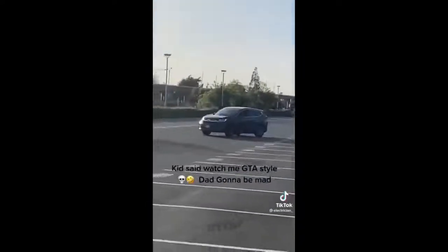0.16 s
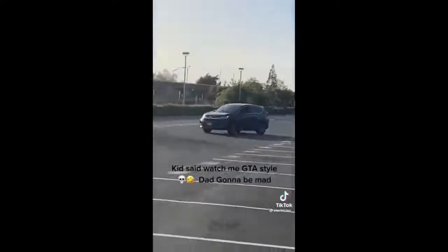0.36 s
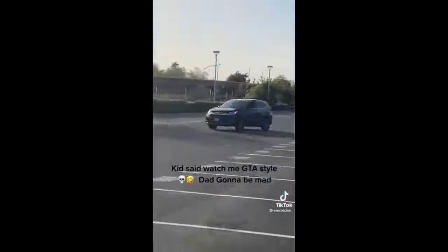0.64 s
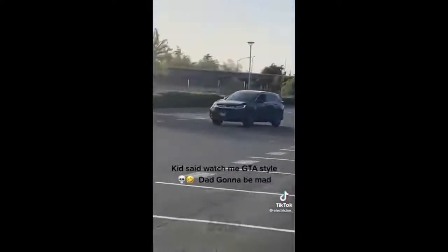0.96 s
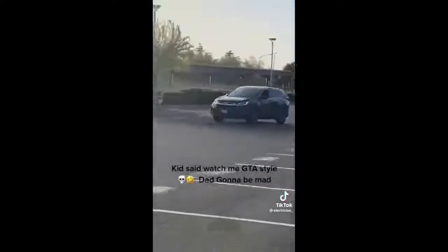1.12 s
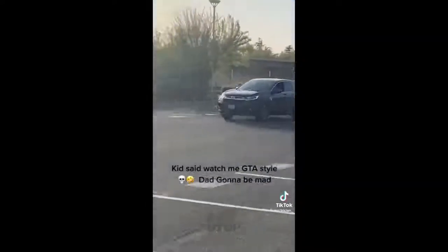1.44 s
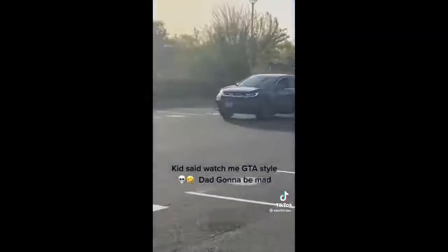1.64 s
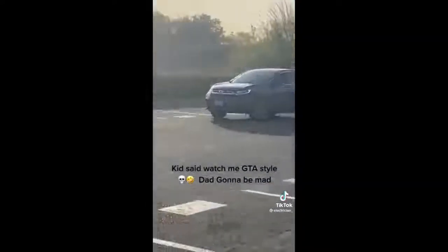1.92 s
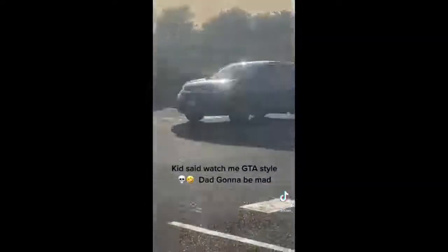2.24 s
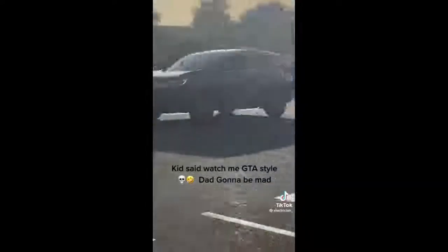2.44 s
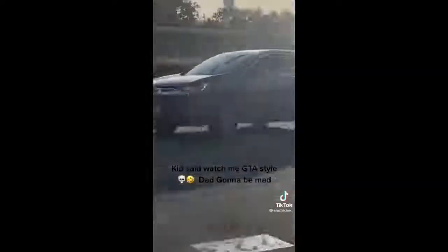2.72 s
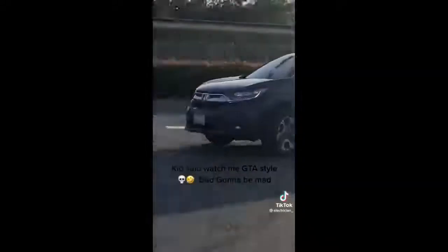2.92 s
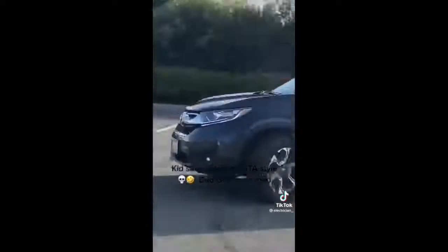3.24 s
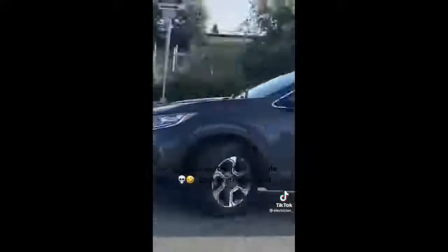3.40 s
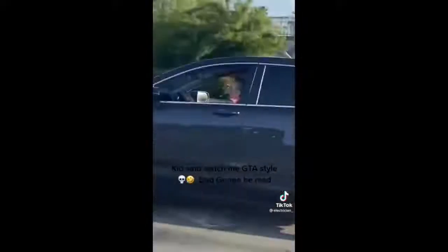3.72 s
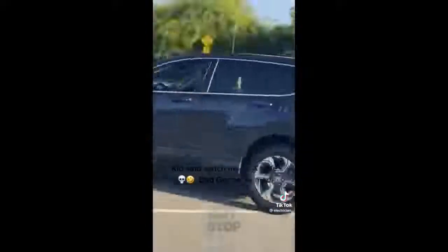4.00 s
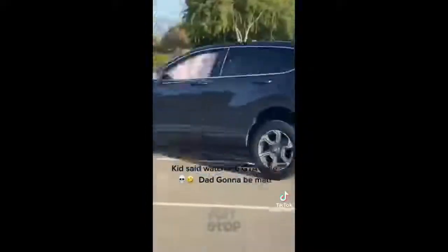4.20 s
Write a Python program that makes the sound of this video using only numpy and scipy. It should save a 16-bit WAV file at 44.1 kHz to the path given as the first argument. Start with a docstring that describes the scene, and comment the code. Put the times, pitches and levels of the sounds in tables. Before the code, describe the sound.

Low distant hum and rolling tyres build into loud, wavering tyre squeals sliding slightly down in pitch, cut off by a burst of air.

```python
"""An empty asphalt lot: a car speeds up and skids through a tight turn close to a phone's microphone.
Its tread sticks and slips about a thousand times a second: ragged squeals narrow towards one falling tone.
Sine partials form squeal and exhaust hum; coloured noise forms scrape, road roar and wind.
A distant hum comes before the turn; at the end a blast of air hits the microphone."""
import sys
import numpy as np
from scipy import signal
from scipy.fft import rfft, irfft, next_fast_len
from scipy.io import wavfile
from scipy.ndimage import uniform_filter1d, map_coordinates

SR = 44100
rng = np.random.default_rng(int(sys.argv[2]) if len(sys.argv) > 2 else 0)


def pcm_store(signal):
    """Save signal as 16-bit PCM."""
    levels = np.round(np.clip(np.atleast_2d(signal), -1, 1) * 32767)
    wavfile.write(sys.argv[1], SR, levels.astype(np.int16).T)


N = 192276

# Every "half" below is the standard deviation of a bell-shaped swell.
# Stick-slip rate of the loaded tyre, sliding wide and then biting again: [t/s, f/Hz]
SLIP_PITCH = [
    [(2.12, 1223), (2.18, 1203), (2.255, 1172), (2.29, 1126), (2.335, 1184), (2.38, 1083), (2.42, 1145),
     (2.46, 1166), (2.51, 1129), (2.59, 1148), (2.66, 1092), (2.69, 1125), (2.72, 1088), (2.77, 1089),
     (2.83, 1040), (2.89, 1102), (2.96, 1065), (3.005, 963), (3.05, 1077)],
    [(3.08, 1197), (3.12, 1127), (3.172, 1121), (3.195, 1043), (3.31, 1044), (3.385, 1013), (3.428, 972),
     (3.445, 995), (3.47, 952), (3.49, 989), (3.515, 950.4), (3.54, 979.7), (3.565, 955), (3.612, 992),
     (3.635, 1032), (3.68, 952.5), (3.71, 904.7), (3.738, 940), (3.768, 940), (3.81, 996.4), (3.86, 974),
     (3.885, 1011), (3.93, 965), (3.965, 975), (4.01, 1006), (4.035, 946), (4.05, 990), (4.095, 991),
     (4.115, 925)],
]
# Squeal strength before the balance with the other patches: [t/s, fundamental/dB, octave/dB]
SQUEAL_LEVELS = [(2.1, -34, -47), (2.15, -29.5, -40), (2.2, -31, -27), (2.35, -20, -19), (2.5, -22, -22.5),
                 (2.72, -20, -19), (2.83, -23, -27.5), (2.92, -20.5, -22.5), (3.04, -21.5, -24.5),
                 (3.15, -20.5, -16), (3.22, -17.5, -19), (3.26, -21, -21), (3.48, -26, -21),
                 (3.535, -20, -19.5), (3.6, -23.5, -22), (3.73, -28.5, -22.5), (3.795, -22, -24.5),
                 (3.86, -22, -23), (3.92, -28.5, -26.5), (3.99, -28.5, -22.5), (4.1, -33, -31),
                 (4.125, -27.5, -28.5)]
# Other tread patches against the leading tone: [pitch ratio, fundamental/dB, octave/dB]
TREAD_PATCHES = [(.86, -15.5, -14.5), (.93, -3, -6.5), (.975, 1.5, 1.5), (1.04, -1.5, -3.5),
                 (1.1, 0.5, -29), (1.19, -3.5, -22), (1.4, -7, -15.5)]
# Upper partials against the octave: [multiple, sliding/dB, singing/dB, once past/dB]
UPPER_PARTIALS = [(3, -22, -19.5, -11), (4, -26, -22, -22), (5, -34, -28, -32), (6, -42, -38, -42)]
# Brief level changes where the tread catches: [t/s, fundamental change/dB, octave change/dB]
TREAD_CATCHES = [(2.399, -7, -4), (2.97, -6, 5.5), (3.196, -12.5, 2), (3.263, -11.5, -4), (3.303, -4, 0.5),
                 (3.462, -1, -5), (3.604, -9, -0.5), (3.622, 0.5, -8.5), (3.73, -1.5, -5.5),
                 (3.926, 2.5, -1), (4.03, 2, -3), (4.1, -1.5, 0.5)]
CATCH_HALF_S = 0.006
# Short slips where the tread snaps loose: [t/s, f/Hz, fundamental/dB, octave/dB, half/s]
SNAP_CHIRPS = [(2.387, 966, -30, -28, 0.016), (2.407, 1156, -15.5, -34, 0.0064),
               (2.565, 1085, -29, -21.5, .006), (2.66, 1084, -27, -13, 0.006),
               (2.825, 982, -33, -32, 0.013), (3.001, 944.5, -16, -16.5, 0.0056),
               (3.124, 1015, -22, -21, 0.026), (3.632, 1134, -28, -26.5, 0.009),
               (3.793, 1103, -25, -24, 0.0068), (3.88, 1134, -29.5, -31, 0.0085),
               (4.03, 840, -38, -32, .012), (4.068, 810, -35.5, -36, 0.016),
               (4.13, 901.5, -32, -34, 0.0065)]
CHIRP_SAG_HZ_PER_S = 1500
# Many patches sing while the tyre slides wide, then it settles
SLIDE_S, SPREAD_S, SETTLE_S, SETTLING_S = 2.1, 0.086, 3.053, 0.11
# The other patches against the leading tone
SLIDING_DB, SETTLED_DB = 2, -7
# The upper partials change as the tyre starts to sing, and again as it passes the listener
SING_S, SINGING_S = 3.05, 0.22
PASS_S, PASSING_S = 3.493, 0.29
# Short strands of each patch: nominal strands a second; sag and scatter as shares of pitch; strength spread
STRAND_RATE, STRAND_SAG, STRAND_SCATTER, STRAND_DB = 13, 0.045, 0.014, 2

# Colour of rubber scraping over asphalt: [f/Hz, relative level/dB]
SCRAPE_COLOUR = [(300, -45), (700, -12), (1000, 4.5), (1500, -1), (2000, 8), (2700, -5), (3400, -5),
                 (3900, -11.5), (5000, -12.5), (6000, -23), (8000, -60), (11000, -34.5), (15500, -42.5)]
# Harsh bites of rubber on stone: [t/s, level/dB, half/s]
RUBBER_BITES = [(2.03, -37.5, 0.0021), (2.59, -36, 0.022), (2.652, -28.5, 0.013), (2.725, -30, 0.0065),
                (3.07, -42, .012), (3.605, -31, 0.016), (3.655, -35, 0.021), (3.795, -31.5, 0.015),
                (3.875, -38, .018), (3.99, -39.5, 0.015)]
# Colour of those bites: [f/Hz, relative level/dB]
BITE_COLOUR = [(1500, -15.5), (2500, -1), (3400, 4.5), (4500, -4), (6000, -23), (12000, -33)]
# The scrape swells, holds through the turn and eases as the tyre grips
SCRUB_S, SCRUB_ATTACK_S, SCRUB_END_S, SCRUB_RELEASE_S = 1.883, 0.46, 3.837, 0.68
SCRUB_DB, SCRUB_DEPTH_DB = -26.5, 20
# A tyre that sings purely rasps less
SMOOTHER_DB, SMOOTHING_S = 4.5, 0.74

# Rolling-tyre roar before a fixed gain: [t/s, level/dB]
ROAD_LEVEL = [(0.0, -52.5), (1.24, -47), (1.42, -45), (2.24, -36.5), (2.97, -44.5), (3.14, -49),
              (3.33, -56.5), (3.77, -53.5), (4.05, -54)]
# Colour of the roar: [f/Hz, relative level/dB]
ROAR_COLOUR = [(120, -28), (240, -0.5), (420, -1.5), (600, 3.5), (900, 3), (1150, -1.5), (1550, 0),
               (2100, -11.5), (3000, -31), (5000, -66)]
# Colour of the tread hiss: [f/Hz, relative level/dB]
HISS_COLOUR = [(1200, -28), (2200, 4), (4000, -1), (6000, -13), (9000, -12), (15500, -29.5)]
HISS_DB = -16  # against the roar
# Extra swells of hiss, the strongest at the close pass: [t/s, level/dB, half/s]
HISS_RISES = [(.02, -64, 0.054), (.55, -63, 0.081), (1.1, -66.5, 0.32), (2.9, -43.5, 0.56)]
# Soft thumps of wheels on uneven asphalt: [t/s, level/dB, half/s]
WHEEL_THUMPS = [(.21, -48, 0.011), (.295, -51, .016), (.875, -41, 0.012), (1.335, -45.5, 0.014),
                (1.378, -41, 0.025), (1.434, -37.5, 0.0097), (1.71, -40, 0.018), (1.81, -48, .016),
                (2.06, -34.5, 0.018)]
# Colour of the thumps: [f/Hz, relative level/dB]
THUMP_COLOUR = [(200, -6), (450, -4), (580, 8), (800, -5), (1500, -35), (4000, -43)]
# Slow surges and fine grain of the surface: random knots a second and depth
SURGE_RATE, SURGE_DB, GRAIN_RATE, GRAIN_DB = 22, 1.3, 190, 1.7

# Engine revs up, coasts down and is hidden as the nose sweeps past; two firings a turn:
# [t/s, firing f/Hz, firing tone/dB, harmonics/dB]
ENGINE_RUN = [(0, 112, -60, -47), (1.2, 114, -48, -47), (1.62, 123.4, -41, -34.5),
              (1.89, 131.8, -32.5, -33), (2.05, 140.2, -30, -24.5), (2.18, 146.3, -28.5, -29),
              (2.32, 155.1, -25, -25.5), (2.45, 162.9, -27, -36), (2.7, 168.1, -30, -33),
              (2.85, 170, -29, -39), (3.1, 165.5, -33.5, -33.5), (3.22, 134.8, -49, -46),
              (3.27, 125, -62, -53), (3.47, 118.3, -66, -53), (3.58, 115.4, -48, -52), (4.1, 113, -48, -58)]
# Exhaust harmonics: [multiple of the crankshaft rate, relative level/dB]
EXHAUST_HARMONICS = [(4, -17), (5, -25.5), (6, -13.5), (7, -21), (8, -18), (9, -22), (10, -22)]
# Exhaust-pipe resonances: [f/Hz, gain/dB]
PIPE_RESONANCES = [(250, 2), (330, -18.5), (385, 5.5), (450, -13), (505, -2), (550, -10), (610, 4),
                   (700, -12), (900, 5)]

# Wind rumble before a fixed gain: [t/s, level/dB]
WIND_LEVEL = [(0.0, -44.5), (1.48, -42.5), (2.1, -40), (2.29, -34), (2.55, -37), (2.72, -41), (2.82, -36),
              (3.12, -35.5), (3.18, -51), (3.28, -64.5), (4.0, -60)]
# Colour of the rumble: [f/Hz, relative level/dB]
RUMBLE_COLOUR = [(15, -46), (28, -21), (42, 0), (62, 2.5), (120, 0.5), (200, -5.5), (320, -29.5),
                 (450, -25), (800, -75)]
# The passing car stirs the rumble, so that it differs between the two ports
STIR_S, STIR_HALF_S, STIR_DB = 2.5, 0.68, -6.5
# Sharp puffs of air at the microphone: [t/s, low thud/dB, flutter/dB, half/s]
AIR_PUFFS = [(2.396, -27.5, -27.5, 0.011), (2.42, -20, -55, 0.0097), (2.582, -26.5, -33.5, 0.0095),
             (2.759, -31.5, -33, .007), (2.801, -23.5, -37, 0.015), (2.849, -23.5, -27, 0.012),
             (2.887, -26, -25.5, 0.014), (2.961, -20.5, -26, 0.02), (3.008, -21.5, -32.5, 0.014),
             (3.056, -26, -34.5, .014), (3.093, -23, -22.5, 0.012), (3.118, -22, -37.5, .014),
             (4.139, -22, -28.5, 0.011), (4.184, -17.5, -23, 0.015), (4.226, -22.5, -32, 0.011),
             (4.26, -31, -50, 0.013)]
# Colour of the thud: [f/Hz, relative level/dB]
THUD_COLOUR = [(25, -32), (55, -12), (85, 3), (170, 3), (240, -9), (400, -26.5), (900, -63)]
# Colour of the flutter: [f/Hz, relative level/dB]
FLUTTER_COLOUR = [(130, -20), (220, -1), (310, 2), (420, -6.5), (600, -15), (900, -15), (1500, -12),
                  (4000, -54)]
# Surges of the last, harsh blast: [t/s, level/dB, time from onset to fall/s]
BLAST_SURGES = [(4.127, -28, 0.061), (4.148, -17.5, 0.0078), (4.163, -13, 0.026), (4.253, -33, 0.012)]
BLAST_ATTACK_S, BLAST_FALL_DB_PER_S = 0.004, 519
# Colour of the blast: [f/Hz, relative level/dB]
BLAST_COLOUR = [(60, -17), (100, -3), (190, -7.5), (280, 5.5), (400, -8.5), (520, -1.5), (660, 6.5),
                (900, -1.5), (1400, -7), (2200, -8.5), (3800, -10), (6200, -21), (9000, -25), (15500, -33)]
# A rush and a rumble start with the blast and last to the end
AFTER_RUSH_DB, AFTER_RUMBLE_DB = -33.5, -42
# Colour of that rush: [f/Hz, relative level/dB]
AFTER_COLOUR = [(40, -3), (150, -0.5), (350, 4), (520, -4), (1100, -10.5), (1350, -1.5), (1600, -32),
                (3700, -15), (6500, -26.5), (9000, -27.5), (15500, -29.5)]

# Distant car and traffic: a drone and a tone that swells once, both fading as the car nears
FAR_HZ, FAR_TONE_DB, FAR_DRONE_DB, FAR_END_S, FAR_FADE_S = 211.4, -49.5, -45, 1.43, 0.4
FAR_SWELL_S, FAR_SWELL_HALF_S, FAR_SWELL_DB = 0.16, 0.075, 12
# Colour of the drone: [f/Hz, relative level/dB]
DRONE_COLOUR = [(100, -4), (190, -3.5), (250, 0), (330, -0.5), (420, -15.5), (900, -70)]
# Decay of the lot's echo: [f/Hz, time to fall 60 dB/s]
LOT_DECAY = [(200, 0.23), (2000, 0.2), (10000, 0.12)]
# Stereo width of the noises before each one's offset: [f/Hz, side against mid/dB]
STEREO_WIDTH = [(60, -28), (150, -14), (300, 0.5), (600, -3), (1000, -12), (1600, -72), (2400, -41),
                (3200, -50), (4400, -2.5), (6000, 13.5), (10000, 5)]
# Microphone ports, left against right: [f/Hz, level/dB]
PORT_LEAN = [(200, -0.5), (850, -1), (1100, -4.5), (1300, 0), (1500, -4), (1950, 0), (2300, 1), (3000, 0)]
# Microphone ports, phase by which left leads: [f/Hz, phase/rad]
PORT_LEAD = [(500, -0.23), (1000, -0.42), (1450, -0.42), (1900, -0.29), (2400, 0.76), (3000, -0.24)]
TOP_HZ = 15550  # upper band limit of the microphone


def squeal():
    """The loaded tyre leads; other patches slide in short strands around its pitch and beat with it."""
    hz, = curves(np.concatenate(SLIP_PITCH))
    caught_db = sum(np.outer([db1, db2], bump(s, CATCH_HALF_S)) for s, db1, db2 in TREAD_CATCHES)
    first, octave = amp(curves(SQUEAL_LEVELS) + caught_db)
    sliding = held(SLIDE_S, SPREAD_S, SETTLE_S, SETTLING_S)
    crowd = amp(SETTLED_DB + (SLIDING_DB - SETTLED_DB) * sliding)
    lead = tread(hz, first, octave, wander=0.0065 + 0.003 * sliding, jitter=0.0105 + 0.003 * sliding,
                 flutter_db=1.7, gap_db=2.9)
    drift = uniform_filter1d(hz, size=SR // 4)  # the others follow only the slow trend
    others = np.zeros(N)
    for ratio, db1, db2 in TREAD_PATCHES:
        glide, gain = strands()
        others += gain * tread(drift * ratio * glide, first * amp(db1), octave * amp(db2),
                               wander=0.011, jitter=0.016, flutter_db=2.7, gap_db=3)
    chorus = (lead + amp(-4.5) * crowd * others) / np.sqrt(1 + crowd ** 2)
    return amp(0.36) * during(SQUEAL_LEVELS, fade=0.018) * chorus


def tread(hz, first, octave, wander, jitter, flutter_db, gap_db):
    """One patch of rubber sticking and slipping; the asphalt's grain shakes its pitch and strength."""
    phase = turning(hz * (1 + wander * wobble(95) + jitter * wobble(520)))
    grip_db = flutter_db * wobble(230)
    sings, past = ramp(SING_S, SINGING_S), ramp(PASS_S, PASSING_S)
    partials = [(1, first), (2, octave)]
    for k, slide_db, sing_db, past_db in UPPER_PARTIALS:
        level_db = slide_db + (sing_db - slide_db) * sings + (past_db - sing_db) * past
        partials.append((k, octave * amp(level_db)))
    out = np.zeros(N)
    # as the wheel turns the paths to the listener shift: each partial fades by itself
    for k, gain in partials:
        depth_db = gap_db * (1.6 if k == 1 else 1)
        fading_db = -depth_db * np.maximum(wobble(100), 0) ** 2
        if k != 2:
            fading_db = fading_db + 2.2 * np.tanh(wobble(55))
        smear = 0.085 * k ** 1.75 * wobble(300)  # phase in radians, widest in the high partials
        out += gain * unit(amp(grip_db + fading_db)) * np.sin(round(k) * phase + smear)
    return np.sqrt(2) * out


def strands():
    """Pitch factor and gain of a patch that keeps breaking loose at a new pitch, which sags until it grips."""
    count = np.cumsum(STRAND_RATE * amp(4 * wobble(20))) / SR + rng.random()
    which, age = count.astype(int), count % 1
    pitch, size = rng.standard_normal((which[-1] + 1, 2))[which].T
    glide = 1 + STRAND_SCATTER * pitch + STRAND_SAG * (0.5 - age)
    return glide, unit(amp(STRAND_DB * np.tanh(size)) * np.sin(np.pi * age) ** 0.39)


def chirps():
    """Brief slips of a single tread block, each sagging in pitch."""
    out = np.zeros(N)
    for s, hz, first_db, octave_db, half in SNAP_CHIRPS:
        phase = turning(hz * (1 + 0.02423 * wobble(300)) - CHIRP_SAG_HZ_PER_S * (clock() - s))
        tone = amp(first_db) * np.sin(phase) + amp(octave_db) * np.sin(2 * phase)
        out += np.sqrt(2) * bump(s, half) * tone
    return out


def scrub():
    """Sliding rubber tears over the stones in a gritty rasp, with a few harsher bites."""
    hold = held(SCRUB_S, SCRUB_ATTACK_S, SCRUB_END_S, SCRUB_RELEASE_S)
    level_db = SCRUB_DB - SCRUB_DEPTH_DB * (1 - hold)
    grit = unit(amp(1.6 * wobble(90) + 1.7 * wobble(700)))
    smoother_db = SMOOTHER_DB * ramp(SETTLE_S, SMOOTHING_S)
    steady = ramp(SCRUB_S, 0.068) * amp(level_db - smoother_db) * rush(SCRAPE_COLOUR, side_db=-10.0)
    return grit * (steady + swells(RUBBER_BITES) * rush(BITE_COLOUR, side_db=-7.5))


def road():
    """Rolling tyres roar, hiss and thump; roar and hiss surge and rattle with the uneven surface."""
    roar_db = curves(ROAD_LEVEL)[0] + 3.2
    surface_db = SURGE_DB * wobble(SURGE_RATE)
    roar = amp(roar_db + surface_db + GRAIN_DB * wobble(GRAIN_RATE)) * rush(ROAR_COLOUR, side_db=3.5)
    hiss_gain = amp(roar_db + HISS_DB) + swells(HISS_RISES)
    hiss = hiss_gain * amp(0.5 * surface_db + 1.4 * wobble(300)) * rush(HISS_COLOUR, side_db=-10.0)
    return roar + hiss + swells(WHEEL_THUMPS) * rush(THUMP_COLOUR, side_db=-2)


def engine():
    """Exhaust hum climbs under throttle and drops at lift-off; harmonics surface at pipe resonances."""
    hz, firing_db, harmonics_db = curves(ENGINE_RUN)
    crank = turning(hz / 2 * (1 + 0.0058 * wobble(24.3)))

    def hum(wave):
        """The firing tone and its exhaust harmonics, as sines or cosines."""
        out = amp(firing_db + 1.1 * wobble(14)) * wave(2 * crank)
        # reflections across the lot fade, blur and widen the harmonics
        for k, db in EXHAUST_HARMONICS:
            level = amp(harmonics_db + db + along(PIPE_RESONANCES, k * hz / 2))
            fading = unit(amp(3.5 * wobble(18)))
            out = out + level * fading * wave(round(k) * crank + 0.8 * wobble(40))
        return out

    return np.sqrt(2) * (hum(np.sin) + amp(-15.0) * np.array([[1], [-1]]) * hum(np.cos))


def wind():
    """Air rumbles on the microphone; puffs thud and flutter, and the last blast rasps."""
    after = ramp(BLAST_SURGES[0][0], BLAST_ATTACK_S)
    breeze = amp(curves(WIND_LEVEL)[0] + 6.0) + amp(AFTER_RUMBLE_DB) * after
    stir_gain = amp(STIR_DB) * bump(STIR_S, STIR_HALF_S)
    stir = stir_gain * np.array([[1], [-1]]) * rush(RUMBLE_COLOUR, side_db=12)[0]
    rumble = breeze * amp(1.9 * wobble(21.65)) * (rush(RUMBLE_COLOUR, side_db=-26) + stir)

    eddies = unit(amp(2.5 * wobble(200)))
    thud, flutter = sum(np.outer(amp([thud_db, flutter_db]), bump(s, half))
                        for s, thud_db, flutter_db, half in AIR_PUFFS)
    puffs = eddies * (thud * rush(THUD_COLOUR, side_db=-13.0) + flutter * rush(FLUTTER_COLOUR, side_db=-18))

    crackle_db = 3 * wobble(420)
    surges = []
    for s, db, hold in BLAST_SURGES:
        fall_db = BLAST_FALL_DB_PER_S * np.maximum(clock() - s - hold, 0)
        surges.append(ramp(s, BLAST_ATTACK_S) * amp(db - fall_db))
    blast = np.max(surges, axis=0) * amp(crackle_db) * rush(BLAST_COLOUR, side_db=-11)
    wake_gain = amp(AFTER_RUSH_DB + 2.5 * wobble(70) + 0.5 * crackle_db) * after
    wake = wake_gain * rush(AFTER_COLOUR, side_db=-12.5)
    return rumble + puffs + blast + wake


def far_hum():
    """A low drone and a wavering tone carry across the lot before the car comes near."""
    hum_db = FAR_TONE_DB + FAR_SWELL_DB * bump(FAR_SWELL_S, FAR_SWELL_HALF_S)
    phase = turning(FAR_HZ * (1 + 0.0162 * wobble(24.85)))
    tone = np.sqrt(2) * amp(hum_db + 1.7 * wobble(15.2)) * np.sin(phase)
    drone = amp(FAR_DRONE_DB + 1.4 * wobble(27)) * rush(DRONE_COLOUR, side_db=-26)
    return (1 - ramp(FAR_END_S, FAR_FADE_S)) * (tone + drone)


def lot(x):
    """Scattered answer of hedges, kerbs and a distant wall: a decaying noise tail for each side."""
    hz, t, z = signal.stft(rng.standard_normal((2, SR // 2)), SR, nperseg=256)
    decay = amp(-60 * t / along(LOT_DECAY, hz)[:, None])
    tail = signal.istft(z * decay, SR, nperseg=256)[1]
    return signal.fftconvolve(x[None], tail / np.linalg.norm(tail[0]), axes=1)[:, :N]


def rush(spectrum, side_db):
    """Coloured stereo noise with a mid of rms 1 and a side set by the width table."""
    def colour(hz):
        side = amp(along(STEREO_WIDTH, hz) + side_db)
        return amp(along(spectrum, hz)) * np.array([np.ones_like(hz), side])

    mid, side = filtered(rng.standard_normal((2, N)), colour)
    return np.array([mid + side, mid - side]) / np.std(mid)


def amp(db):
    """Decibels to gain."""
    return 10 ** (np.asarray(db) / 20)


def unit(x):
    """Scale to rms 1."""
    return x / np.sqrt(np.mean(x ** 2) + 1e-20)


def clock():
    """The time of every sample, in seconds."""
    return np.arange(N) / SR


def along(points, hz):
    """Values of (Hz, value) points read on a log frequency axis."""
    f, v = np.transpose(points)
    return np.interp(np.log(hz + 1), np.log(f + 1), v)


def curves(rows):
    """One value per sample for each column after the time."""
    s, *cols = np.transpose(rows)
    return [np.interp(clock(), s, c) for c in cols]


def during(rows, fade):
    """1 over the span of a table, fading to 0 outside it."""
    start, end = rows[0][0], rows[-1][0]
    return np.interp(clock(), [start - fade, start, end, end + fade], [0, 1, 1, 0])


def bump(s, half):
    """A bell-shaped swell around time s."""
    return np.exp(-0.5 * ((clock() - s) / half) ** 2)


def swells(rows):
    """The summed gain of (s, dB, half) swells."""
    return sum(amp(db) * bump(s, half) for s, db, half in rows)


def ramp(start, length):
    """0 before start, rising evenly to 1 over length seconds."""
    return np.clip((clock() - start) / length, 0, 1)


def held(start, attack, end, release):
    """Attack, hold and release, from 0 to 1 and back."""
    return ramp(start, attack) - ramp(end, release)


def wobble(rate):
    """A smooth random curve, rate knots a second."""
    own_rng = np.random.default_rng(rng.integers(2 ** 32))
    knots = own_rng.standard_normal(int(N * rate / SR) + 4)
    return map_coordinates(knots, [clock() * rate])


def turning(hz):
    """The phase of an oscillator that follows a pitch curve."""
    return 2 * np.pi * (np.cumsum(hz) / SR + rng.random())


def filtered(x, response):
    """x times a response of frequency."""
    m = next_fast_len(N + SR // 4)
    return irfft(rfft(x, m) * response(np.fft.rfftfreq(m, 1 / SR)), m)[..., :N]


def scene():
    """The skidding car, the echo of its squeal, the distant hum and the wind."""
    tyres = squeal() + chirps()
    return tyres + amp(-17.5) * lot(tyres) + scrub() + road() + engine() + far_hum() + wind()


def record(dry):
    """The phone's two ports differ in level and phase; peaks are rounded off and the band is limited."""
    def ports(hz):
        left_to_right = amp(along(PORT_LEAN, hz)) * np.exp(1j * along(PORT_LEAD, hz))
        return left_to_right ** np.array([[0.5], [-0.5]])  # half to each port

    x = filtered(dry, ports)
    x = x / (1 + (x / 0.9) ** 6) ** (1 / 6)
    return filtered(x, lambda hz: hz < TOP_HZ)


dry = scene()
out = record(dry)
pcm_store(out)
```